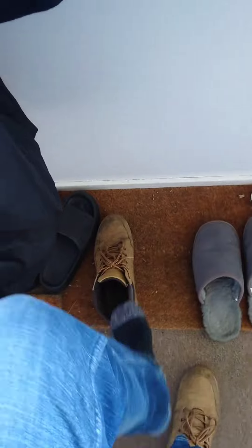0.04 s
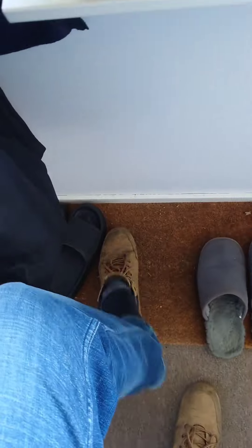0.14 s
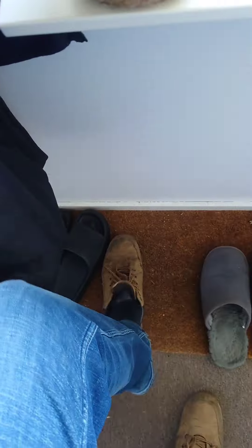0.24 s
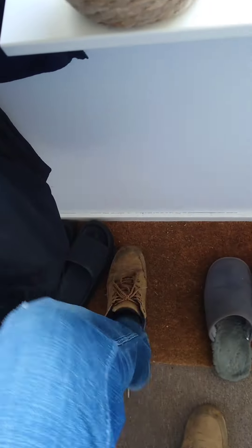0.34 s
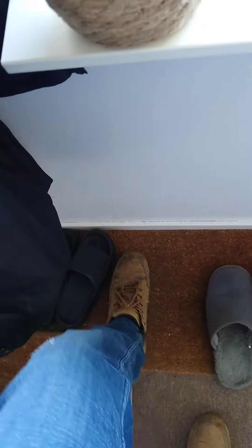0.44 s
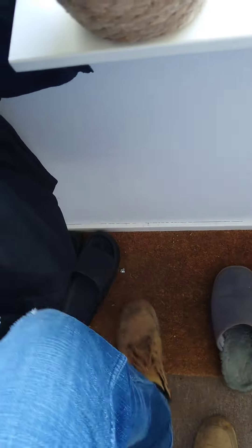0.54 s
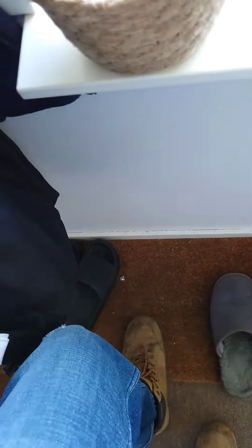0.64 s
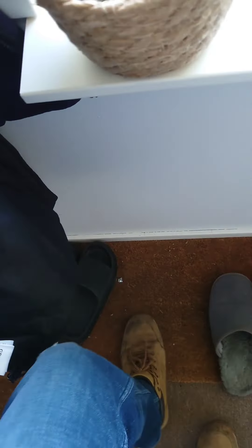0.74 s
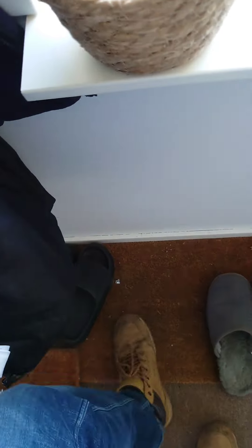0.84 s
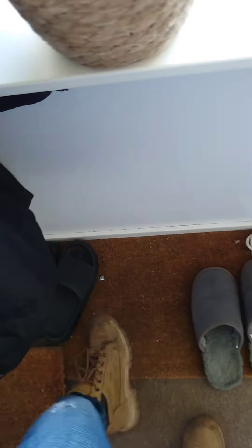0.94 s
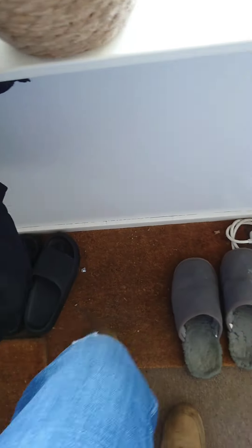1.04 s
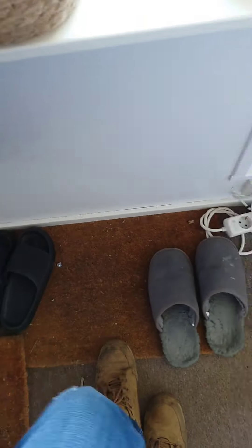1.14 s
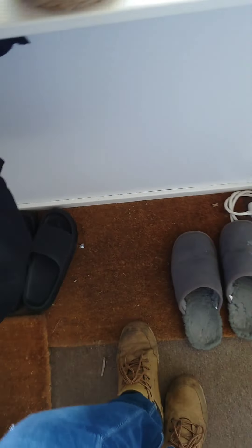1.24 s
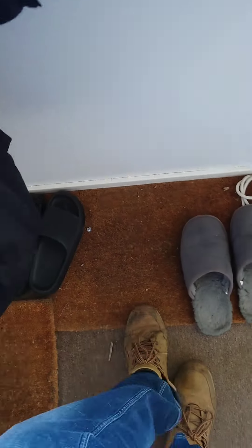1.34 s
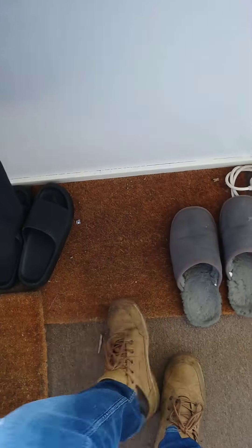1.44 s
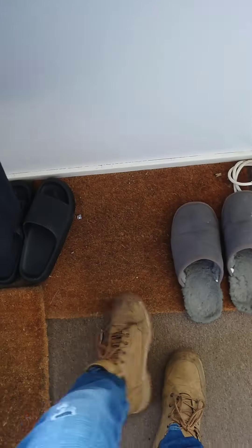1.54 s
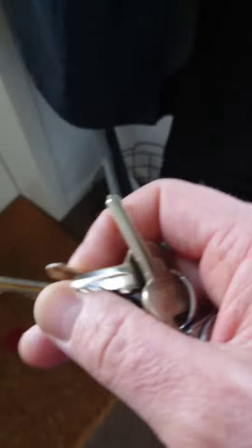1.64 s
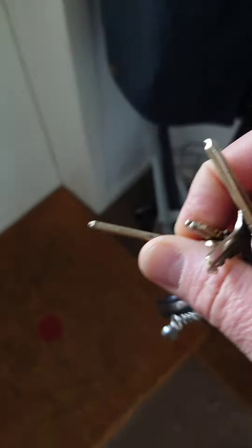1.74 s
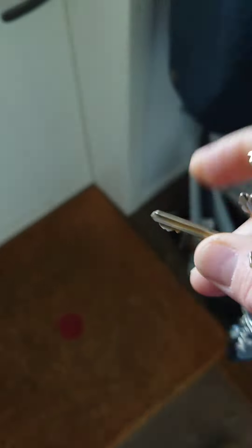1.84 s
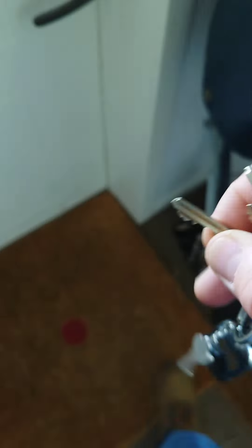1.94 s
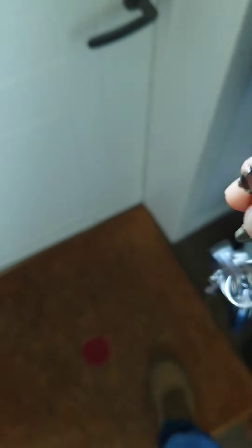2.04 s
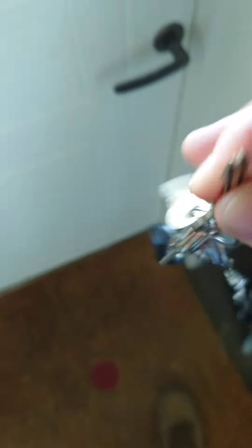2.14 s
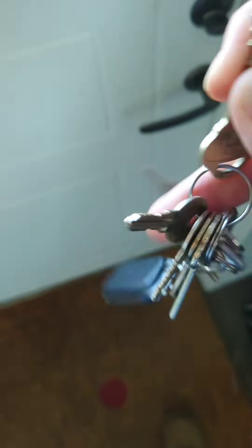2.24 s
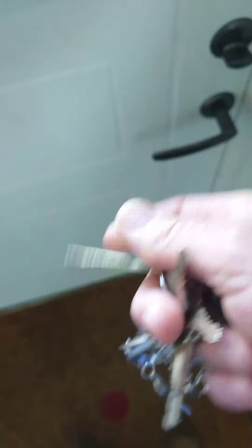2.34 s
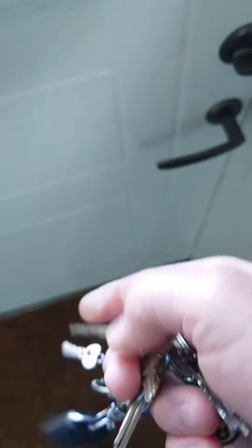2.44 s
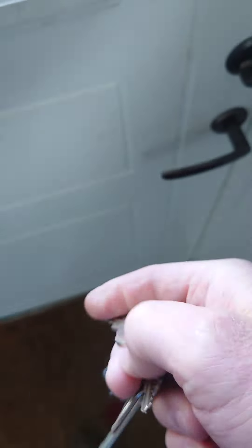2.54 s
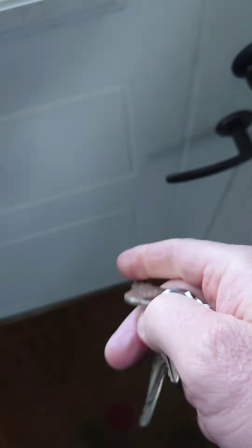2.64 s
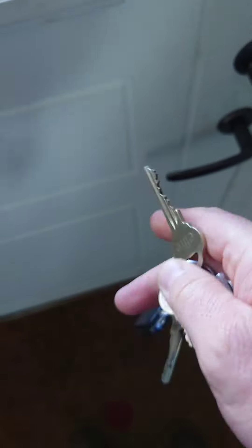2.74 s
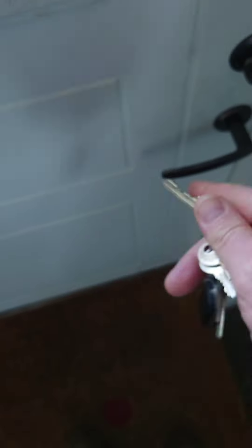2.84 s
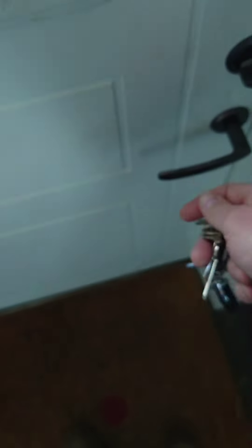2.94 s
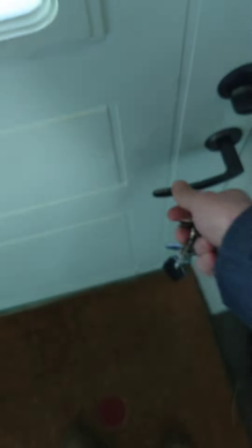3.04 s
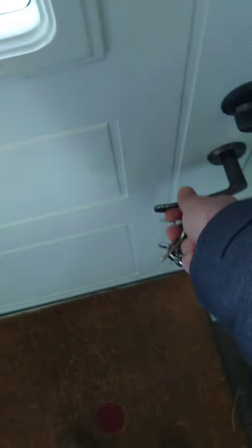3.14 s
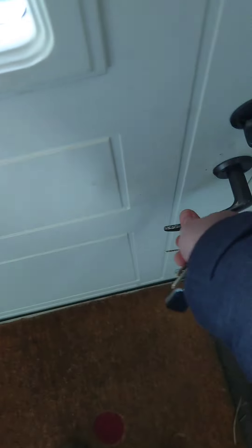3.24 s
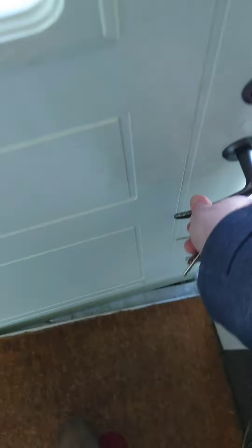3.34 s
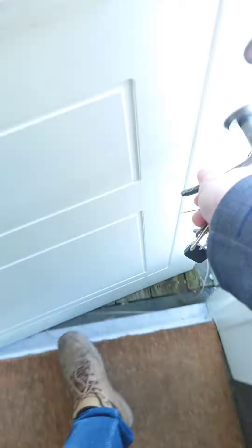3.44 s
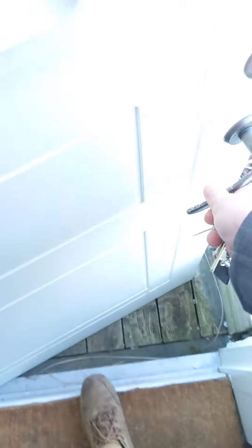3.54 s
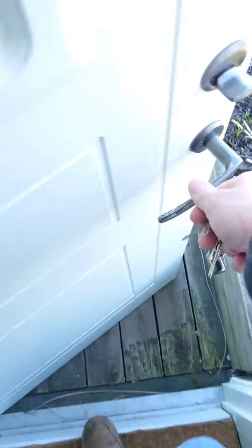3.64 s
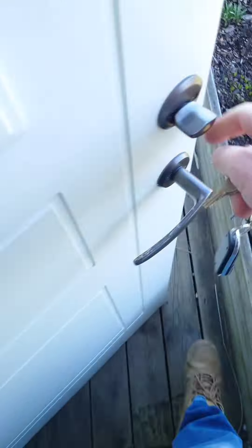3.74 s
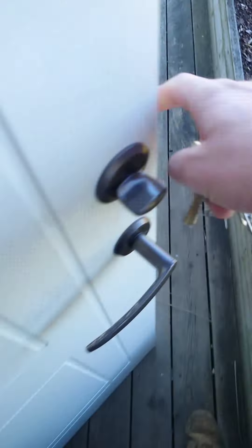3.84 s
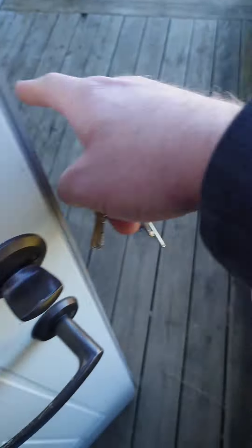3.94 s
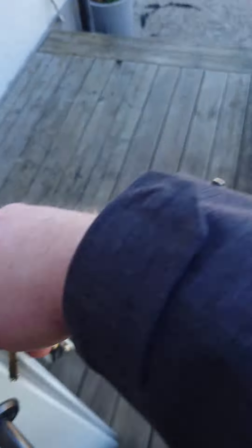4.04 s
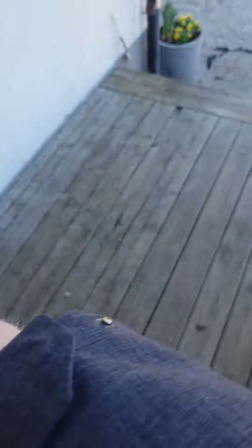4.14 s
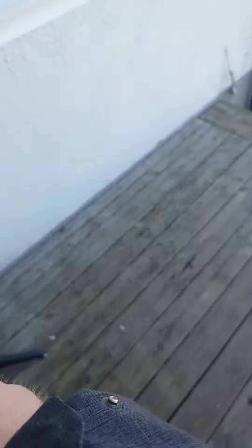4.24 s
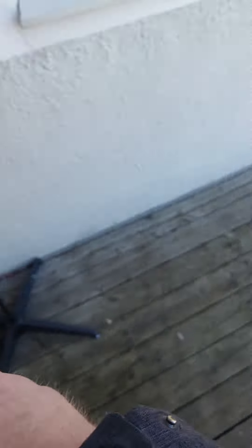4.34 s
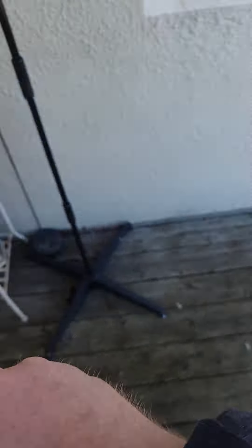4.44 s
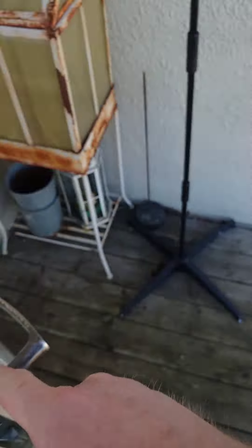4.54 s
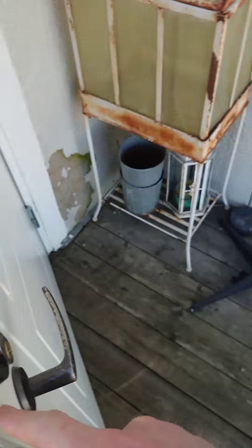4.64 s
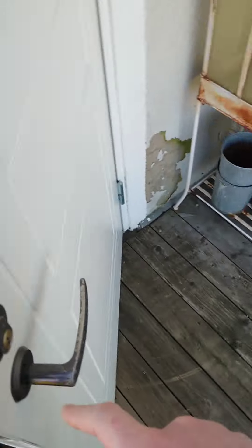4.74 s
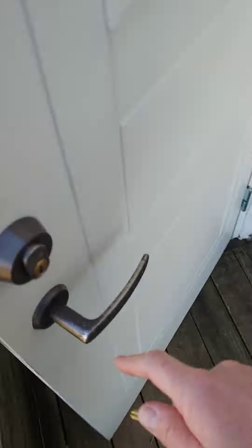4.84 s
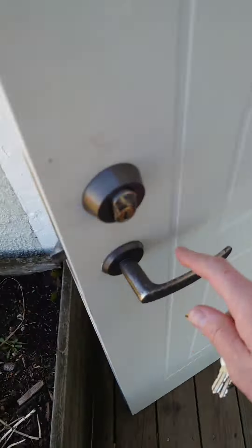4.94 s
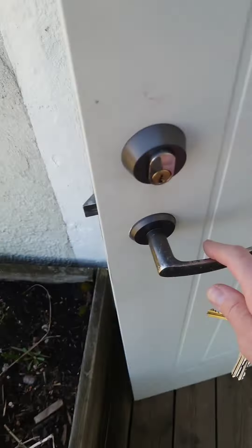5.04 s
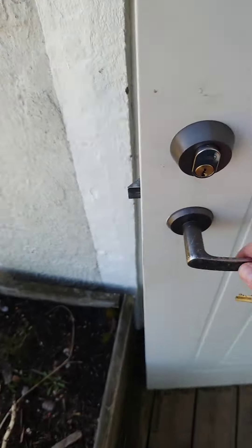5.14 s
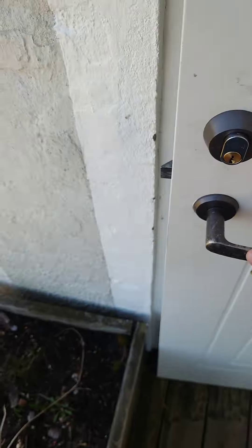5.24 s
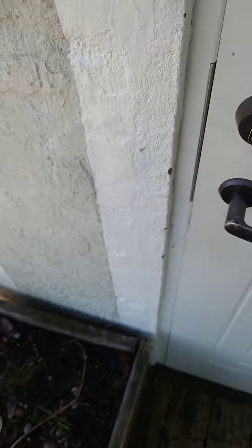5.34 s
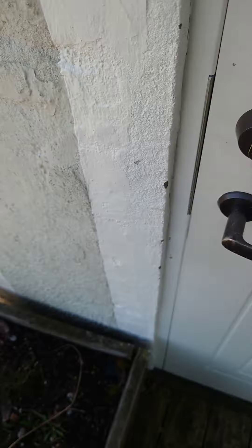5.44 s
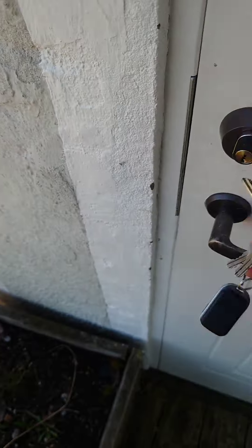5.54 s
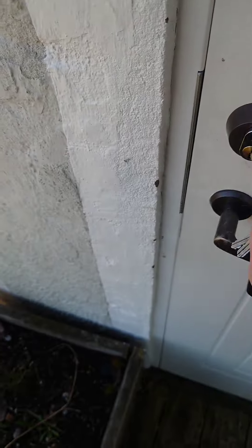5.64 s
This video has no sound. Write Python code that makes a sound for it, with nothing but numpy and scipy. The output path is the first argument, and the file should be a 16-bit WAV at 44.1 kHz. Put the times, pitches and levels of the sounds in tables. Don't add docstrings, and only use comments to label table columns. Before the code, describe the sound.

Close handheld stereo pickup in a small entryway: cloth rustles and a boot thuds dully onto the floor. A bunch of keys clinks, is tossed in a bright jangle, and is sorted with quick clicks. A door handle and latch clack sharply, steps and handling bumps follow, then outside a rubber seal squeaks and the door booms shut, with a few light key ticks after.

```python
import sys
import numpy as np
from scipy import signal
from scipy.fft import rfft, irfft
from scipy.io import wavfile
from scipy.ndimage import uniform_filter1d

SR = 44100
rng = np.random.default_rng(int(sys.argv[2]) if len(sys.argv) > 2 else 0)


def inscribe(sig):
    pcm = np.round(np.clip(np.atleast_2d(sig).T, -1, 1) * 32767)
    wavfile.write(sys.argv[1], SR, pcm.astype(np.int16))


def elevation(decibels):
    levels = np.asarray(decibels, float)
    return 10 ** (levels / 20)


N = 250488
PORTS = np.array([[1], [-1]])


def shaped(points, size=N):
    hz, db = np.transpose(points)
    log_hz = np.log(np.fft.rfftfreq(size, 1 / SR) + 1)
    gain = elevation(np.interp(log_hz, np.log(hz), db, left=-70, right=-70))
    x = irfft(rfft(rng.standard_normal(size)) * gain, size)
    return x / np.std(x)


def walk(rate):
    hold = int(SR / rate)
    levels = np.repeat(rng.standard_normal(N // hold + 1), hold)
    return 1.73 * uniform_filter1d(levels, hold)[:N]


def blow(rise, fall, stop=2):
    t = np.arange(int(SR * (rise + 3 * fall)) + 2) / SR
    push = np.sin(np.pi / 2 * t / rise) ** 2
    return t, np.where(t < rise, push, np.exp(-np.abs((t - rise) / fall) ** stop))


def excerpt(x, place, t):
    return x[int(place * N / 2):][:len(t)]


def add(out, s, x, db, pan_db, lag):
    x = x * elevation(db) / np.max(np.abs(x))
    for port, sign in enumerate((1, -1)):
        i = max(int(s * SR + sign * lag / 2), 0)
        part = x[:N - i]
        out[port, i:i + len(part)] += part * elevation(sign * np.clip(pan_db, -24, 24) / 2)


def loose_mode(t, hz, rough, flutter):
    return np.imag((1 - rough + rough * flutter) * np.exp(2j * np.pi * hz * t))


DOOR_LAG = -11

STEPS = [(0.378, -46, 280, 0.047), (0.578, -34.5, 42.3, 0.019), (0.604, -38.5, 40.6, 0.032),
         (0.949, -25, 157, 0.027), (1.135, -27.5, 142, 0.022), (1.161, -47, 150, 0.021),
         (1.59, -42.5, 148.5, 0.026), (2.046, -37.5, 68.7, 0.039), (2.403, -39, 93.6, 0.037),
         (2.438, -42.5, 41, 0.026), (4.083, -38.5, 208.6, 0.042), (4.121, -34, 65, 0.03),
         (4.361, -33.5, 270, 0.0082), (4.397, -34.5, 61, 0.025)]
LEAF = [(3.154, -35.5, 342, 0.014), (3.199, -31.5, 145, 0.018), (3.219, -25, 376, 0.022),
        (3.2555, -13.5, 111, 0.0049), (3.276, -19.5, 88.4, 0.018), (3.295, -26, 68, 0.027),
        (3.363, -22, 65, 0.018), (3.382, -24, 86.6, 0.054), (3.634, -32.5, 171, 0.038),
        (3.678, -30.5, 111, 0.01), (3.875, -13.5, 499, 0.0092), (3.891, -23, 283, 0.0064),
        (3.962, -33, 289, 0.015), (4.994, -36.5, 363, 0.0105), (5.029, -34, 306, 0.012),
        (5.186, -40, 119, 0.0053), (5.343, -15, 101, 0.013), (5.36, -18, 139, 0.054),
        (5.384, -7, 71.7, 0.012), (5.408, -22, 82, 0.021), (5.445, -30, 181.5, 0.031)]
LEFT_TAPS = [
    (3.495, -32, 104, 0.022),
    (3.499, -40, 298, 0.0036),
    (3.511, -35, 247, 0.0057),
    (3.527, -33, 178, 0.013),
    (3.552, -30.5, 294, 0.0045),
    (3.562, -33, 197, 0.0052),
    (3.57, -31.5, 99, 0.011),
    (3.582, -30, 117, 0.0055),
]
RIGHT_TAPS = [
    (0.004, -44, 135, 0.0043),
    (4.028, -34.5, 178, 0.0046),
    (4.643, -36.5, 202, 0.0036),
    (4.652, -38, 68, 0.04),
    (4.716, -34.5, 104, 0.006),
    (5.661, -39, 308, 0.014),
]


def thuds(out):
    creak = shaped(RUMBLE)
    rows = [(*row, -3 * np.log2(row[2] / 102)) for row in STEPS + LEAF]
    rows += [(*row, 20) for row in LEFT_TAPS] + [(*row, -20) for row in RIGHT_TAPS]
    rows = sorted(rows)
    for (s, db, hz, fall, pan_db), turn in zip(rows, rng.random((len(rows), 3))):
        t, env = blow(0.5 / hz, fall, stop=3.4)
        body = np.sin(2 * np.pi * hz * t)
        body += 0.39 * np.sin(2 * np.pi * 0.686 * hz * t)
        body += 0.2 * np.sin(2 * np.pi * (2.175 * hz * t + turn[2]))
        body += 0.43 * excerpt(creak, turn[1], t)
        add(out, s, env * body, db, pan_db, 6 * turn[2] - 3)


SCUFFS = [(0.583, -34.5, -14, 0.011), (0.608, -45, -9, 0.014), (0.737, -43.5, -7, 0.014),
          (0.824, -45.5, -5, 0.0086), (0.953, -35.5, -10.5, 0.016), (1.069, -42.5, 14, 0.012),
          (1.138, -35.5, -6.5, 0.018), (1.212, -49, -7, 0.019), (1.26, -44, 10, 0.022),
          (1.299, -38.5, -15, 0.013), (1.322, -40, -15, 0.02), (1.352, -39, -12, 0.012)]
KNOCKS = [(3.154, -36.5, 8, 0.007), (3.22, -8.5, 8.5, 0.013), (3.234, -16, -11, 0.025),
          (3.261, -11.5, -5.5, 0.018), (3.283, -38, -11, 0.014), (3.325, -31.5, 19, 0.055),
          (3.374, -28.5, -18, 0.013), (3.399, -24, -1.5, 0.014), (3.407, -23, 0, 0.01),
          (3.418, -40, -6, 0.0085), (3.604, -27.5, 2.5, 0.023), (3.641, -17.5, 3, 0.011),
          (3.874, -29.5, -7.5, 0.023), (4.359, -40.5, -12, 0.031), (5.341, -24, -8, 0.012),
          (5.35, -17, -2, 0.022), (5.367, -24.5, -1, 0.015), (5.383, -16.5, -1, 0.014),
          (5.394, -19.5, -11, 0.0093), (5.449, -30, -7.5, 0.015), (5.662, -29, -7, 0.011)]
TICKS = [(0.561, -33.5, -15, 0.0051), (1.855, -39, 22, 0.013), (1.898, -41.5, 14, 0.0041),
         (2.628, -49, 26, 0.0052), (2.523, -49, 20, 0.0028), (3.412, -17.5, -1.5, 0.0038),
         (3.64, -14, 19, 0.0051), (4.273, -40, 22, 0.005), (4.597, -35, 18, 0.005), (4.832, -42, 0, 0.0013),
         (4.925, -37, -5.5, 0.0036), (5.507, -47.5, 16, 0.008)]
# [f/Hz, level/dB per Hz]
KNOCK_SPECTRUM = [(180, -59), (300, -6), (1480, -9.5), (1930, -7), (3090, -13.5), (3590, -17), (4310, -15),
                  (6900, -30.5), (8160, -23), (15200, -43.5), (16500, -59)]


def knocks(out):
    rows = [(*row, pan_db) for table, pan_db in ((SCUFFS, -7), (KNOCKS, -3.5), (TICKS, -3.5)) for row in table]
    wood = shaped(KNOCK_SPECTRUM) * elevation(1.3 * walk(600))
    dull = signal.sosfilt(signal.butter(2, 1500, fs=SR, output="sos"), wood)
    bright = wood - dull
    for (s, db, treble_db, fall, pan_db), turn in zip(rows, rng.random((len(rows), 2))):
        t, env = blow(0.32 * fall, fall)
        treble = elevation(min(treble_db, 20)) * env ** 0.89 * excerpt(bright, turn[0], t)
        lag = DOOR_LAG + 20 * turn[1] - 10
        add(out, s, env * excerpt(dull, turn[0], t) + treble, db, pan_db, lag)


PART_NOTES = [(1.853, 4620, -46, 0.0075, 0.55), (1.8535, 2520, -47, .006, 0.54),
              (2.04, 4500, -42, 0.0067, 0.26), (2.043, 2850, -42, 0.019, 0.6),
              (2.063, 1605, -39, 0.0059, 0.5), (2.138, 3270, -48, 0.024, 0.17),
              (2.6, 2130, -47, 0.036, 0.9), (3.223, 3670, -23, 0.015, 1), (3.227, 1930, -28, 0.013, 0.9),
              (3.228, 410, -13.5, 0.01, 0.5), (3.261, 1290, -18, .01, .5), (3.268, 635, -22, 0.021, 0.14),
              (3.269, 910, -26, 0.021, 0.4), (3.268, 4400, -40, 0.022, 0.95),
              (3.275, 2020, -26, 0.012, 0.7), (3.34, 1750, -36, .014, .95), (3.361, 1366, -34, 0.023, 0.2),
              (3.4115, 1762, -18, 0.0052, .6), (3.41, 905, -30.5, 0.017, 0.44),
              (3.642, 716, -28.5, 0.025, 0.4), (4.272, 2350, -38.5, 0.005, 0.42),
              (4.83, 1850, -42.5, 0.0056, 0.34), (4.849, 500, -45, 0.0034, 0.3),
              (5.256, 331, -36.5, 0.038, 0.38), (5.351, 3710, -31, 0.019, 0.9),
              (5.381, 799, -24.5, 0.011, 0), (5.391, 1950, -24.5, 0.01, 0.4),
              (5.39, 4700, -30, 0.008, .95), (5.508, 2300, -42, 0.0045, 0.5),
              (5.617, 6540, -47, 0.014, 0.1), (5.6155, 12700, -46.5, .018, 0),
              (5.6155, 14930, -38, .024, 0.06), (5.6615, 3810, -31, 0.0032, 0.37),
              (0.0, 450, -48.5, 0.0078, 0.26), (0.561, 830, -44, 0.0043, 0.2),
              (0.77, 44.8, -55, 0.027, 0.17), (2.49, 36.7, -52.5, 0.044, 0.1),
              (3.236, 1494, -29, 0.0088, 0.6), (3.284, 307, -20.5, 0.011, 0.17),
              (3.362, 299, -32.5, 0.025, 0.27), (3.873, 1530, -26, 0.0049, 0.42),
              (4.597, 1710, -44.5, 0.0079, 0.4), (4.78, 70, -41.5, 0.017, 0.08),
              (4.801, 453, -43.5, .005, 0.42), (4.831, 500, -47, .004, 0.4), (4.924, 480, -41, 0.0028, .3),
              (1.21, 717, -42, 0.012, 0.7), (1.272, 2000, -50, .02, 0.9), (5.04, 119, -39, 0.031, 0.4),
              (5.345, 391, -23, 0.027, .4), (5.45, 600, -39, 0.025, 0.54), (5.662, 598, -33, 0.022, 0.45)]


def part_notes(out):
    flutter = walk(500) + 1j * walk(500)
    rattle = []
    for a, b, c in rng.random((50, 3)):
        s, hz = np.interp(a, (0, 1), (2.018, 2.155)), np.interp(b, (0, 1), (2300, 5850))
        rattle.append((s, hz, -50 - 8 * c, 0.017 * (.5 + c), .3))
    rows = PART_NOTES + rattle
    for (s, hz, db, fall, rough), turn in zip(rows, rng.random(len(rows))):
        t, env = blow(max(0.15 * fall, 1 / hz), fall)
        tone = loose_mode(t, hz, np.clip(rough, 0, 1), excerpt(flutter, turn, t))
        lag = 1 if hz > 1600 else DOOR_LAG
        add(out, s, env * tone, db, -3.5, lag)


def slam(out):
    t, env = blow(0.0036, 0.012, stop=2.3)
    add(out, 5.3385, np.sqrt(env) * np.sin(2 * np.pi * 154.7 * t), -5, -2, 0)


# [t/s, peak level/dB, dull part level/dB]
CLINKS = [(1.692, -30.5, -2), (1.701, -36, -6), (1.7428, -33.5, 6), (1.75, -37, 0), (1.814, -23.5, -4),
          (1.82, -38, -6), (1.853, -38.5, 17), (1.898, -33, 6), (1.951, -34, -14), (2.205, -26, -18),
          (2.2739, -30.5, -19), (2.37, -32.5, -6), (2.3856, -33, -15), (2.398, -30, -9), (2.424, -36, 5),
          (2.602, -44, 12), (2.6276, -27, 4), (2.665, -35, -3), (2.673, -38, -4), (2.681, -34, 1),
          (2.7115, -37, 4), (2.811, -38, 7), (2.754, -25.5, -4), (2.775, -28, 2), (2.781, -28.5, 4.5),
          (2.7922, -24.5, 1), (2.8455, -31, 1), (2.849, -35, -5), (2.854, -30.5, 0)]
# [t/s, peak level/dB, dull part level/dB]
DANGLE = [(3.2188, -19.5, 14), (3.467, -33, -4), (3.604, -34, 19), (3.639, -31, 0), (3.97, -26.5, 0),
          (4.273, -34, 7), (5.295, -28.5, 3), (5.3876, -19, 8), (5.507, -38, 6), (5.538, -42, -7),
          (5.566, -42, -5), (5.5746, -38, -10), (5.616, -42, 1), (5.649, -39, -2), (5.661, -31, 10),
          (5.668, -33, 12)]
# [t/s, peak level/dB]
SHAKE = [(2.017, -15), (2.0222, -17), (2.038, -11.5), (2.112, -29), (2.175, -42), (2.192, -42),
         (2.0417, -18), (2.046, -14), (2.0544, -25), (2.0664, -32), (2.089, -29), (2.104, -37),
         (2.1214, -34), (2.142, -25), (2.1535, -24), (2.1636, -33)]
# [f/Hz, level/dB per Hz]
CRACK = [(710, -67), (1200, -22), (3470, -13.5), (4540, -6.5), (6830, -12.5), (7440, -10), (7850, -5),
         (11300, -3.5), (12200, -4.5), (15600, 1)]
# [t/s, left minus right level/dB]
HAND = [
    (1.65, -5),
    (1.9, -4),
    (2.05, 1.5),
    (2.2, -7.5),
    (2.8, -4.5),
    (3.3, -9.5),
    (5.68, -14),
]
LOWEST_KEY_HZ, DETUNE = 7300, .05


def key_modes():
    hz = np.array(RINGS)[:, 1]
    return hz[hz > LOWEST_KEY_HZ]


def clinks(out):
    grit, key_hz = shaped(CRACK) * elevation(2.5 * walk(900)), key_modes()
    dull = signal.sosfiltfilt(signal.butter(4, LOWEST_KEY_HZ, fs=SR, output="sos"), grit)
    rows = [(*row, 1) for row in CLINKS + DANGLE] + [(*row, -11, 2.6) for row in SHAKE]
    rows = sorted(rows)
    for (s, db, dull_db, free), turn in zip(rows, rng.random((len(rows), 14))):
        fall = 0.0069 * (1 + 0.15 * (2 * turn[12] - 1))
        pan_db = np.interp(s, *np.transpose(HAND)) + 1.5 * (2 * turn[13] - 1)
        t, env = blow(0.13 * fall, free * fall, stop=1.35)
        crack = excerpt(grit, turn[0], t) + (elevation(dull_db) - 1) * excerpt(dull, turn[0], t)
        crack = crack * (1 + 2.5 * np.exp(-t / .0012))
        hz = key_hz[(turn[2:7] * len(key_hz)).astype(int)] * (1 + DETUNE * (turn[7:12] - .5))
        ring = np.sin(2 * np.pi * (hz[:, None] * t + turn[7:12, None])).sum(axis=0)
        add(out, s, env ** (free ** 2) * crack + 0.15 * env * ring, db, pan_db, 16 * turn[1] - 8)


# [t/s, f/Hz, peak level/dB, length/s]
RINGS = [(2.015, 8600, -37, 0.0091), (2.018, 15500, -21, .016), (2.018, 14200, -32, .014),
         (2.027, 10780, -35, 0.025), (2.037, 7326, -34, 0.012), (2.04, 15500, -20, 0.016),
         (2.063, 8760, -43, 0.018), (2.08, 13000, -31, .037), (2.086, 8900, -31.5, 0.022),
         (2.082, 15650, -22, .018), (2.105, 13900, -20.5, 0.027), (2.108, 8530, -43, 0.026),
         (2.137, 8540, -31.5, 0.011), (2.133, 13300, -30.5, 0.04), (2.15, 15580, -25, 0.02),
         (2.147, 14800, -25, 0.028), (2.153, 9900, -36.5, 0.015), (2.154, 11930, -37.5, 0.024),
         (2.665, 15150, -48, 0.031), (2.774, 7490, -51, 0.017), (5.645, 12300, -54, .012),
         (5.649, 15260, -50, .014), (1.698, 8670, -50.5, 0.01), (1.81, 13800, -40, 0.011),
         (2.009, 12350, -50, .015), (2.04, 12530, -38, .009), (2.041, 9860, -37, .012),
         (2.08, 9800, -41, .018), (2.112, 12100, -38, 0.02), (2.136, 13840, -31, .008),
         (2.214, 15700, -44, 0.034), (2.668, 11600, -53, .025), (2.675, 8750, -55, .012)]
KEY_MODES_HZ = np.array([4600, 6560, 7330, 7640, 8560, 9990, 11280, 11925, 12250, 12530, 13366, 14305, 14930, 15120, 15600])


def rings(out):
    pick, key_hz = rng.random((420, 4)).T, key_modes()
    flutter = walk(700) + 1j * walk(700)
    ring_db, pan_db = 7, -3.5
    swarm_hz = key_hz[(pick[1] * len(key_hz)).astype(int)] * (1 - 2 * DETUNE * pick[2])
    swarm = np.transpose([np.interp(pick[0], (0, 1), (2.018, 2.19)),
                          np.maximum(swarm_hz, LOWEST_KEY_HZ + 900 * pick[2]),
                          -43 - ring_db - 14 * pick[3],
                          .011 * (.5 + pick[3])])
    clear = [(s, KEY_MODES_HZ[np.argmin(np.abs(KEY_MODES_HZ - hz))], *rest) for s, hz, *rest in RINGS]
    rows = [*clear, *swarm]
    for (s, hz, db, length), turn in zip(rows, rng.random((len(rows), 5))):
        t, env = blow(0.39 * length, 0.61 * length)
        rough = .6 if hz > 14700 else .1
        tone = loose_mode(t, hz, rough, excerpt(flutter, turn[2], t))
        add(out, s, env * tone, db + ring_db, pan_db, 1)
        twin = np.sin(2 * np.pi * ((hz + 300 * (turn[0] - .5)) * t + turn[1]))
        add(out, s, env * twin, db + ring_db - 13, pan_db + 16 * (turn[3] - .5), 8 * turn[4])


# [t/s, level/dB]
SQUEAKS = [
    [(4.824, -60), (4.836, -50), (4.848, -52), (4.866, -51), (4.895, -66)],
    [(5.238, -62), (5.255, -45), (5.275, -38), (5.335, -34), (5.35, -46)],
]
# [f/Hz, slip t/s, pitch step share, second level/dB, third level/dB, mute level/dB, second fades dB/s]
SEAL = [
    (1150, 4.849, .04, 2, -14, -5, -330),
    (905, 5.302, -.006, -14, -14, -16, 0),
]
# [multiple, level/dB against the third partial]
OVERTONES = [(4, -20), (5, -12), (6, -11)]


def squeaks():
    t, out = np.arange(N) / SR, 0
    for points, (hz, slip, step, second_db, third_db, mute_db, fade) in zip(SQUEAKS, SEAL):
        s, db = np.transpose(points)
        since, level_db = (t - slip) / .005, np.interp(t, s, db)
        phase = 2 * np.pi * np.cumsum(hz * (1 + .003 * walk(150) + step * np.tanh(since))) / SR
        second_db = second_db + mute_db * np.exp(-since ** 2) + fade * np.clip(t - slip, 0, 1)
        second = elevation(level_db + second_db + 2.5 * walk(90))
        third = elevation(level_db + third_db + 2 * walk(60))
        upper = np.sin(3 * phase)
        for k, more_db in OVERTONES:
            upper = upper + elevation(more_db + .9 * (level_db + 34)) * np.sin(k * phase)
        gate = np.clip(np.minimum(t - s[0], s[-1] - t) / 0.0076, 0, 1)
        tone = elevation(level_db) * np.sin(phase) + second * np.sin(2 * phase) + third * upper
        out = out + gate * np.sqrt(2) * tone
    return out * elevation(-1.5 * PORTS)


def room(hits):
    t60_s, level_db = .12, -13
    t = np.arange(SR // 3) / SR
    tail = rng.standard_normal((2, len(t))) * elevation(-60 * t / t60_s) * (t > .004)
    tail = tail / np.sqrt(np.sum(tail ** 2, axis=1, keepdims=True))
    return elevation(level_db) * signal.fftconvolve(hits, tail, axes=1)[:, :N]


# [t/s, effort level/dB, hiss against brush level/dB]
RUSTLE = [(0.0, -59.5, 2), (0.26, -63, -10), (0.54, -61.5, -5), (0.78, -61.5, -5.5), (1.04, -60.5, -4.5),
          (1.45, -66, -5.5), (1.6, -63, -5), (1.98, -59.5, -0.5), (2.35, -59.5, 6), (2.56, -69, 5.5),
          (2.73, -71.5, 12.5), (2.84, -64, 3.5), (3.19, -59, -3.5), (3.47, -53, -1), (4.16, -55, -0.5),
          (4.57, -60.5, 1), (5.06, -60.5, -1.5), (5.68, -57, -3)]
# [middle t/s, half length/s, gain level/dB, extra hiss level/dB]
STROKES = [(0.392, 0.066, 8, 1.5), (0.588, 0.027, 8.5, -2.5), (0.845, 0.025, 8, -5.5),
           (0.965, 0.042, 4, 0.5), (1.264, 0.24, 9.5, 2.5), (1.52, 0.047, 11, 3), (1.75, 0.25, 2.5, 8),
           (2.08, 0.1, 4, 6), (2.245, 0.095, 5.5, -1), (2.427, 0.032, 16, -9.5), (2.605, 0.016, -5, 21.5),
           (2.689, 0.029, 1.5, 9), (2.802, 0.081, -8, 11), (3.032, 0.21, 10, 1.5), (3.318, 0.12, 13, -4),
           (4.1, 0.02, 5.5, -1.5), (4.28, 0.11, 1.5, 5.5), (4.704, 0.13, 1.5, 5.5),
           (4.807, 0.051, 0.5, 3.5), (5.258, 0.17, 5, 4.5)]
# [t/s, rumble level/dB]
GRIP = [(0.0, -69.5), (0.47, -73), (0.81, -65), (1.01, -70), (1.19, -60.5), (1.58, -75.5), (1.96, -79.5),
        (2.23, -65), (2.5, -89), (2.93, -79), (3.23, -76), (3.37, -42), (3.5, -53), (4.05, -47),
        (4.44, -63.5), (4.63, -56.5), (5.2, -58), (5.68, -61)]
# [t/s, left minus right level/dB]
SLEEVE = [
    (0, -10.5),
    (1.65, -15),
    (2.3, -4.5),
    (3.05, -15),
    (3.5, -6),
    (3.95, -15.5),
    (4.7, -14.5),
    (4.85, -15),
    (5.68, -7),
]
# [f/Hz, level/dB per Hz]
RUMBLE = [(12, -37), (20, -1), (70, 3), (258, -4), (296, -5), (367, -12), (500, -10.5), (650, -56),
          (1100, -120)]
BRUSH = [(88, -27), (150, -8), (297, -8), (378, -1), (489, -3), (1100, -5.5), (1890, -7), (4500, -20.5),
         (5850, -70), (9900, -120)]
HISS = [(800, -27), (1760, -1.5), (3000, -5.5), (5320, -6), (6820, -10)]
SHEEN = [(6820, -13.5), (8140, -4), (11500, -5), (15100, -4), (16000, -8.5), (16300, 0)]


def rustle():
    t = np.arange(N) / SR
    s, effort_db, hiss_more_db = np.transpose(RUSTLE)
    brush_db, extra_db = np.interp(t, s, effort_db), np.interp(t, s, hiss_more_db)
    for middle, half, gain_db, more_db in STROKES:
        sweep = np.clip(1 - np.abs(t - middle) / half, 0, 1)
        brush_db, extra_db = brush_db + gain_db * sweep, extra_db + more_db * sweep
    rumble_db, hiss_db = np.interp(t, *np.transpose(GRIP)), brush_db + extra_db
    sleeve_db = np.interp(t, *np.transpose(SLEEVE)) * PORTS / 2
    stroke, out = walk(40), 0
    # spectrum, level dB, difference between ports, shared and own unevenness dB
    layers = ((RUMBLE, rumble_db, .3, 1.1, 2),
              (BRUSH, brush_db - 4.5, .8, .7, 1.2),
              (HISS, hiss_db - 9, 1.1, .7, 1.2),
              (SHEEN, hiss_db - 5.8, 1.1, .7, 1.3))
    for points, db, apart, stroke_db, own_db in layers:
        pair = shaped(points) + apart * shaped(points) * PORTS
        out = out + pair * elevation(db + stroke_db * stroke + own_db * walk(35) + min(apart, 1) * sleeve_db)
    return out


def scene():
    hits = np.zeros((2, N))
    for add_source in (thuds, knocks, clinks, rings, part_notes, slam):
        add_source(hits)
    hits += squeaks()
    return hits + room(hits) + rustle()


# [start t/s, end t/s]
GAPS = [
    (1.618, 1.629),
    (5.603, 5.608),
]


def low_pass(x):
    return signal.sosfilt(signal.butter(12, 16820, fs=SR, output="sos"), x)


def record(dry):
    t = np.arange(N) / SR
    for start, end in GAPS:
        dry = dry * np.clip(np.maximum(start - t, t - end) / 0.00031, .03, 1)
    top = signal.ellip(8, .2, 30, 15850, fs=SR, output="sos")
    return low_pass(signal.sosfilt(top, dry))


dry = scene()
out = record(dry)
inscribe(out)
```